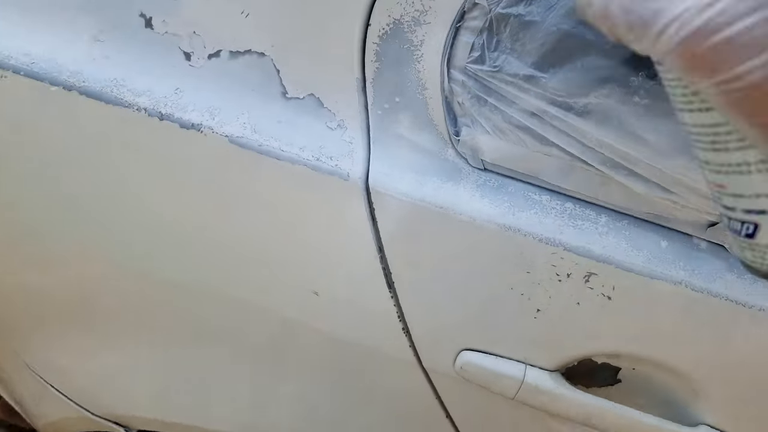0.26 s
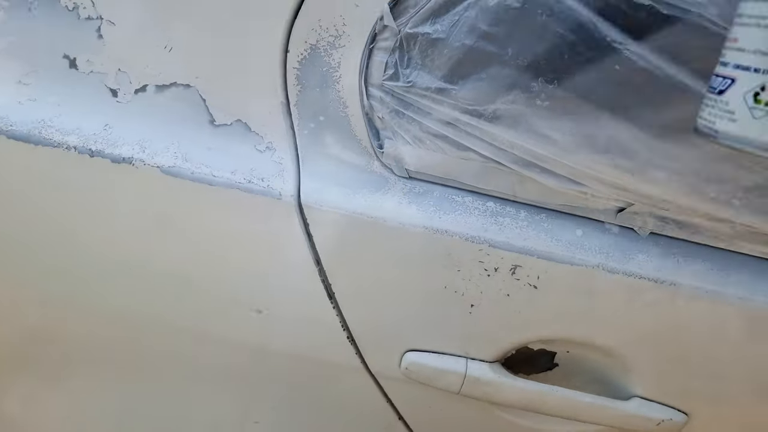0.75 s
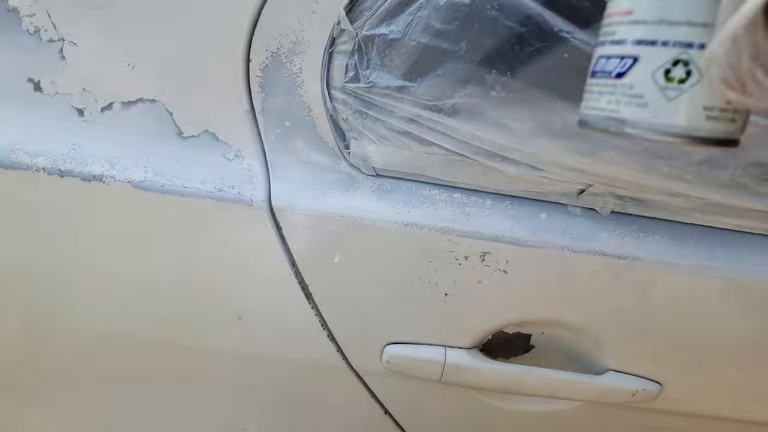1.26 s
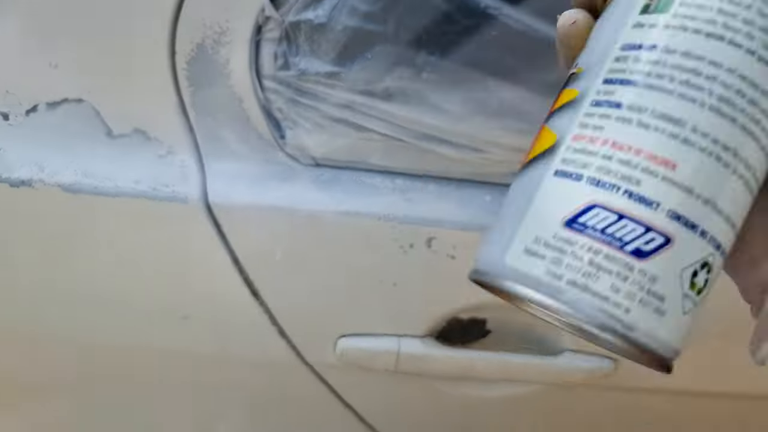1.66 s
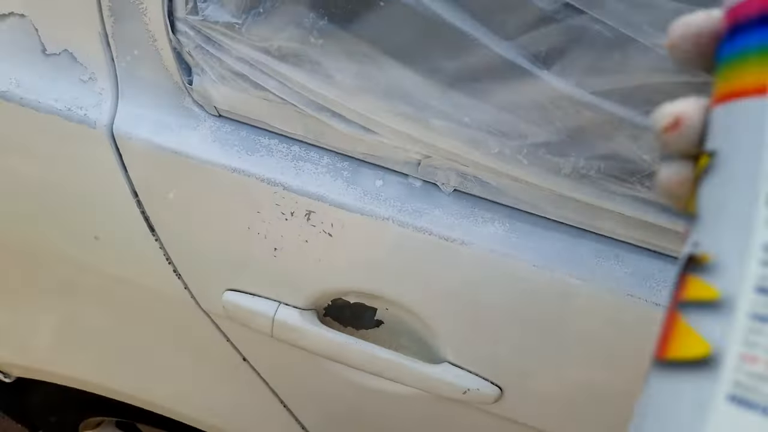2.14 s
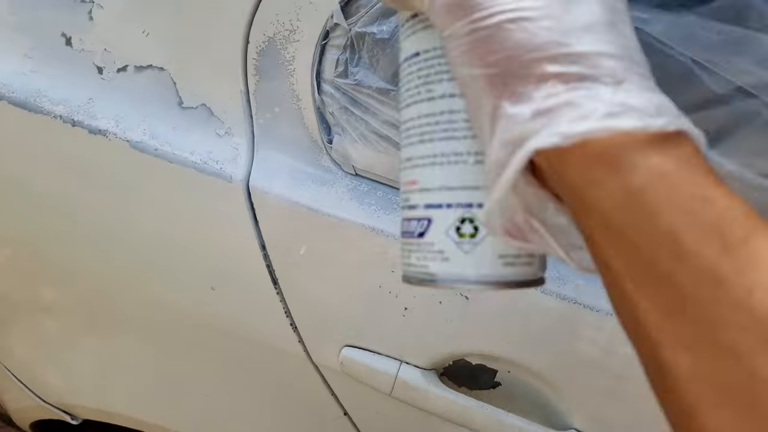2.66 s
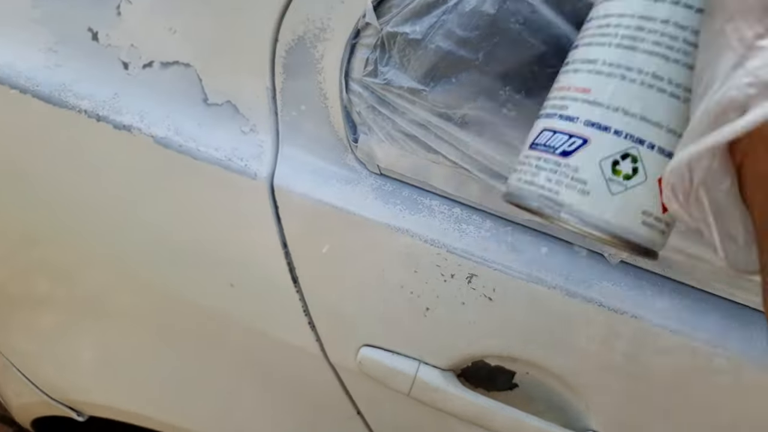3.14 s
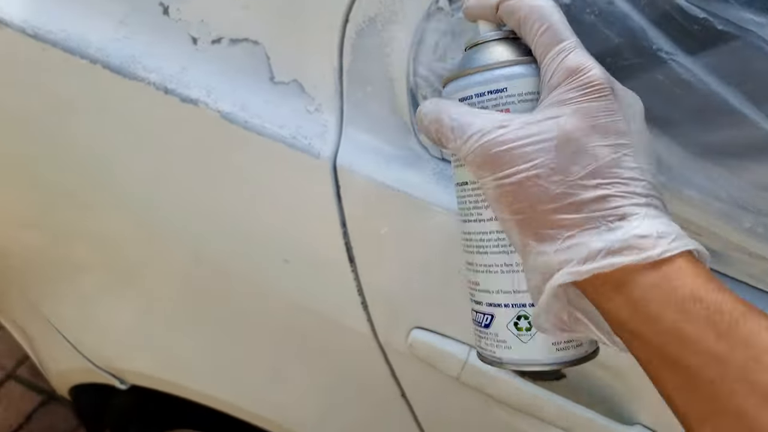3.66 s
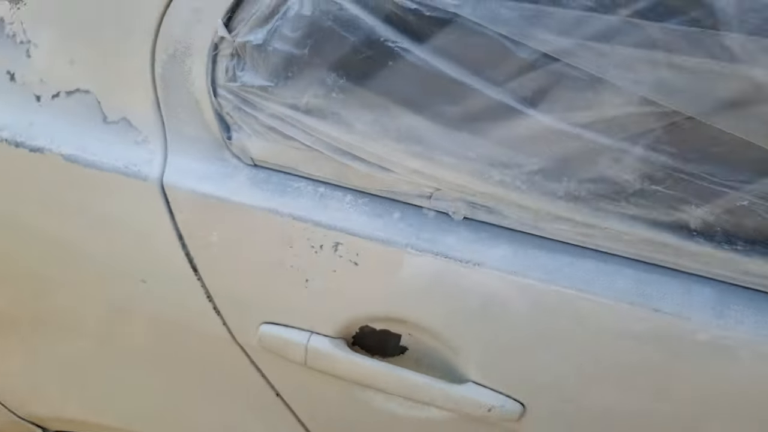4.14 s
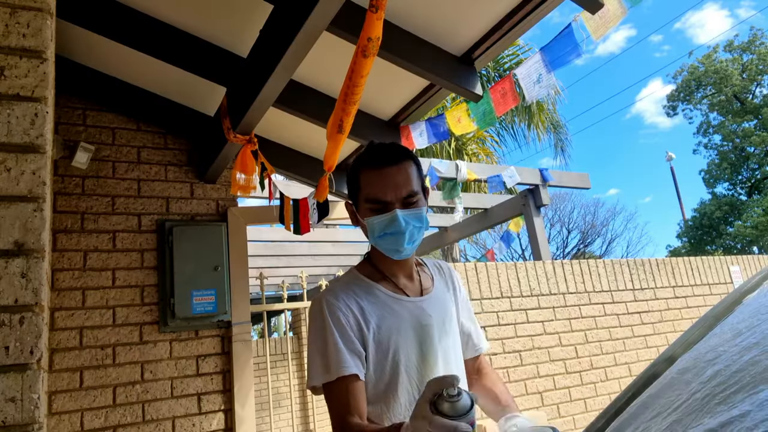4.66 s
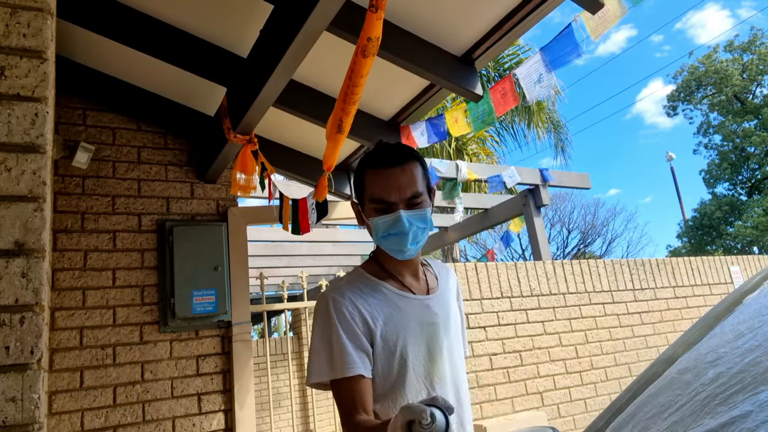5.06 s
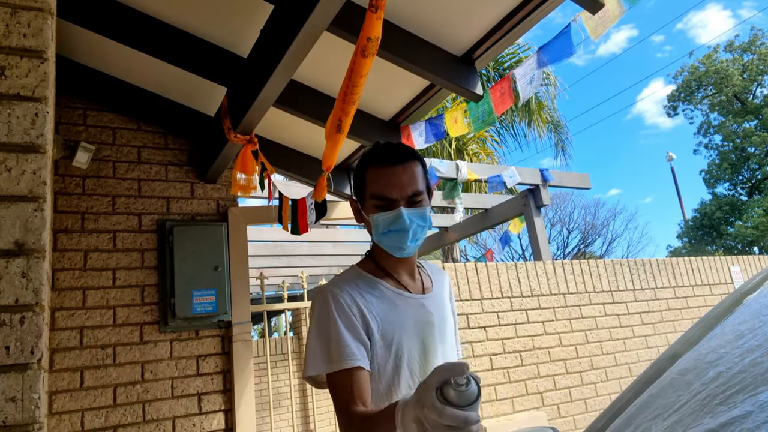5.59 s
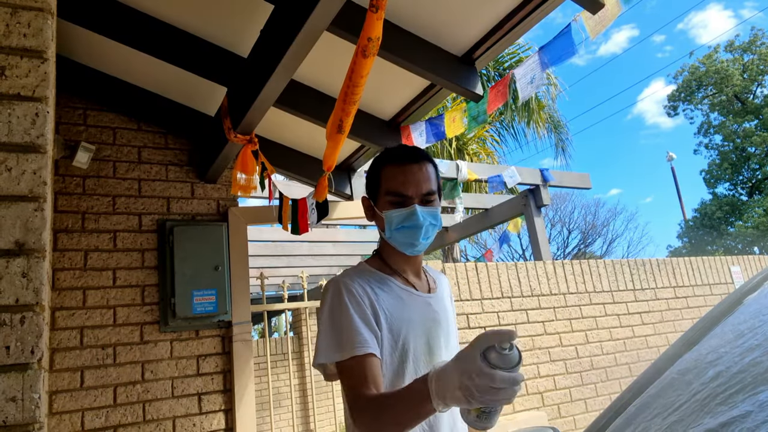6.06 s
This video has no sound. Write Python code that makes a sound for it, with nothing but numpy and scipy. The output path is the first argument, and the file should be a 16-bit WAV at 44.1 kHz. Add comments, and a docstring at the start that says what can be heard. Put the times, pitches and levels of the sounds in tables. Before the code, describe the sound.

A spray can's mixing ball rattles sharply between short bright hissing spurts beside a car, then fainter spurts continue farther off with two panel thuds.

```python
"""A mixing ball knocks on the wall of a shaken aerosol can beside a car: damped wall modes and a noise crack.
From 0.3 s the nozzle fires short spurts of turbulent jet noise, while a glove rustles as grainy hiss.
From 2 s a far whine sounds as a trembling tone, then a like squeak of glove on steel and more spurts.
At 4.3 s the level drops out and swells back; the can is further off, and two panel thuds fall among
its spurts. Throughout, shaped noise gives the distant traffic, and sparse echoes answer can and thuds."""
import sys
import numpy as np
from scipy import signal
from scipy.fft import rfft, irfft
from scipy.io import wavfile
from scipy.ndimage import uniform_filter1d

SR = 44100
rng = np.random.default_rng(int(sys.argv[2]) if len(sys.argv) > 2 else 0)


def transcribe(u):
    """Save the signal u as a 16-bit wav file named by the first command-line argument.

    u: samples, shape (n,) or (channels, n), limited to [-1, 1]; the rate is SR.
    q: integer samples, one column per channel.
    """
    v = np.clip(np.atleast_2d(u).T, -1, 1)
    q = np.round(v * 32767).astype(np.int16)
    wavfile.write(sys.argv[1], SR, q)


def volts_from_decibels(level):
    """Turn decibel levels (scalar or array-like) into linear amplitude factors."""
    exponent = np.asarray(level, float) / 20
    return 10 ** exponent


N = 278712  # length in samples
FAR_FROM_S = 4.312  # from this time the can is further off

# Nozzle spurts. Each row: opening in seconds, shutting in seconds, flow level in dB,
# change of level from open to shut in dB, colour of the body below the treble in dB.
SPURTS = [(0.288, 0.353, -26.5, -0.5, -3), (0.461, 0.546, -27, -1.5, -5), (0.637, 0.718, -29.5, -4, -6.5),
          (0.805, 0.894, -30, -2, -3.5), (0.993, 1.043, -32, -1, -2.5), (1.149, 1.229, -28.5, -2.5, -3),
          (1.304, 1.393, -29, -2, -2.5), (1.483, 1.58, -31.5, 3.5, -5.5), (2.544, 2.61, -32, 1, 0),
          (2.717, 2.815, -34.5, 1.5, -3), (2.922, 3.014, -32.5, 3.5, -4), (3.129, 3.22, -31.5, 1.5, -6.5),
          (3.326, 3.424, -30.5, 0.5, -5.5), (3.562, 3.627, -32, 9.5, -1.5), (3.76, 3.842, -29, 3, -3.5),
          (3.961, 4.048, -29, -7.5, -4.5), (4.475, 4.576, -47.5, -5, 0), (4.602, 4.714, -56, -2, 0),
          (4.732, 4.799, -36.5, -12, -6.5), (4.878, 4.975, -38, -10, -3.5), (5.077, 5.166, -33.5, -5.5, -5),
          (5.254, 5.347, -38, -0.5, -3.5), (5.438, 5.508, -37, -4, -5), (5.606, 5.674, -37.5, -11, -4.5),
          (5.752, 5.832, -36.5, -6.5, -5.5), (5.928, 6.005, -35, -3, -7.5), (6.1, 6.185, -37, -2.5, -6.5),
          (6.278, 6.328, -39, 3, -5)]
# Where the can is held. Each row: time in seconds, treble level left over right in dB,
# lag of the right port in samples.
PLACE = [(0.29, -9.5, 36), (0.46, -10.5, 16), (0.81, -12.5, 24), (1.15, -13, 38), (1.5, -11, 37),
         (2.54, -12.5, 9.9), (2.72, -10.5, 39), (3.33, -9, 39), (3.56, -12.5, 6.1), (3.76, -9.5, 12),
         (3.96, -10.5, 33), (4.4, 1.5, 4.9), (6.3, 4, 6)]
# Spectrum of the jet. Each row: frequency in Hz, relative density in dB per Hz.
JET_SPECTRUM = [(410, -80), (700, -1.5), (1460, 0), (2330, 3), (2840, 7.5), (3640, 2), (4150, 10),
                (4920, 5.5), (7690, 9), (9200, -2), (11000, -1), (12600, 6), (14400, 9), (15400, 0)]
# Likeness of the hiss at the two ports. Each row: frequency in Hz, correlation from 0 to 1.
HISS_LIKENESS = [(500, 1), (2000, 0.29), (5000, 0.26), (9000, 0.24), (15000, 0.13)]
# Clear ball knocks. Each row: time in seconds, peak of the ring in dB, low wall zone in Hz,
# high wall zone in Hz, high zone against low in dB.
KNOCKS = [(0.0239, -13, 2900, 7100, 4), (0.028, -15.5, 1600, 5100, 29), (0.117, -20, 2370, 4070, 26),
          (0.1732, -7, 1770, 3430, 0.5), (0.231, -14, 2840, 3960, 10), (0.2593, -22.5, 2430, 3860, -16),
          (0.3771, -17.5, 2250, 5530, 4), (0.4945, -15, 2850, 4830, -4), (0.519, -22.5, 2450, 5420, -25),
          (0.8066, -5.5, 2420, 4300, -11.5), (0.8493, -18, 2580, 4300, 6), (0.891, -19, 2800, 4300, 3),
          (0.9196, -26, 2500, 4300, 28), (1.0068, -17.5, 1770, 4400, 10.5), (1.0598, -28, 2640, 4570, -1),
          (1.1475, -20.5, 2430, 4470, 1), (1.168, -22.5, 2440, 4400, -12), (1.3251, -10.5, 2780, 5360, 0),
          (1.335, -13, 3020, 5700, -2), (1.6416, -7, 1750, 4400, 12.5), (1.7013, -21.5, 1540, 3200, -26),
          (1.7675, -11, 1860, 3000, 4.5), (1.8292, -20, 1850, 3730, 8.5), (1.87, -18, 2470, 4500, -12),
          (1.8925, -8.5, 2640, 3900, 6.5), (1.9692, -14.5, 2340, 4000, 9.5), (1.997, -29, 1440, 4720, -3),
          (2.0152, -21.5, 1440, 4700, 20), (2.3138, -6.5, 1920, 4240, 9), (2.3211, -8.5, 2700, 3160, -14),
          (2.381, -15.5, 2170, 5750, 29), (2.388, -24.5, 2900, 4650, 21), (2.4053, -8, 2440, 4600, -9),
          (2.5407, -19, 2430, 4600, -6), (2.6029, -21.5, 1530, 4700, 6), (2.757, -23.5, 1700, 4400, 8),
          (2.787, -21, 1320, 7600, 4), (2.842, -7, 2500, 5300, 4), (2.9446, -26, 1390, 4800, 2),
          (3.0561, -8.5, 2320, 4420, 7.5), (3.092, -21.5, 2360, 4450, -3), (3.2687, -8.5, 2520, 4960, -0.5),
          (3.442, -26.5, 2530, 4730, 5), (3.5887, -13, 1880, 4900, 2.5), (3.611, -23.5, 1770, 4470, -15),
          (3.652, -19, 1410, 4430, 27), (3.732, -28, 1180, 4500, 4), (3.858, -10, 2580, 4360, 8),
          (4.091, -13, 2280, 4900, 7), (4.121, -29, 1710, 4460, 7), (5.219, -31.5, 1020, 6700, 21),
          (5.344, -23, 2980, 4400, -5), (5.4234, -29, 1990, 3200, 12), (5.457, -25.5, 2670, 8100, -25),
          (5.5874, -18.5, 2900, 4870, -4), (5.592, -23.5, 2650, 4350, 5), (5.7306, -31, 1070, 3650, 21)]
# Modes of the can wall. Each row: frequency in Hz, relative level in dB.
WALL_MODES = [(950, 3), (1200, 10.5), (1430, 9), (1700, 5.5), (2050, -1.5), (2400, -3), (2600, -3.5),
              (3000, -5), (3400, -4), (3750, -5.5), (4300, -2), (4900, -1), (5450, -1.5), (6100, -23),
              (7400, 0), (8300, 5.5)]
# Spectrum of the contact crack. Each row: frequency in Hz, relative density in dB per Hz.
CRACK_SPECTRUM = [(700, -6.5), (2000, 3.5), (7500, 5.5), (10000, -6), (13500, -1), (16000, -10)]
# Thuds. Each row: time in seconds, level in dB, tilt above 2200 Hz in dB per octave, tail t60 in seconds.
THUDS = [(4.9292, -18, -14.5, 0.17), (5.0963, -12.5, 24, 0.16)]
# Panel modes that the thuds excite. Each row: frequency in Hz, bandwidth in Hz, relative level in dB.
PANEL_MODES = [(255, 31, -3.5), (478, 37, 0.5), (818, 136, 2.5), (1064, 94, 3.5), (1506, 98, -6),
               (2166, 54, -8), (2500, 130, -5), (3600, 140, -21)]
# Glove and paint rustles. Each row: start in seconds, length in seconds, level in dB.
RUSTLES = [(0.09, 0.16, -51), (.22, .08, -52), (1.681, 0.067, -44.5), (1.757, 0.33, -58.5),
           (2.155, 0.095, -48), (2.223, 0.3, -53), (2.638, 0.042, -44), (3.413, 0.14, -56),
           (4.133, 0.091, -49.5), (4.277, 0.058, -45.5), (4.415, 0.36, -59)]
# Spectrum of the rustles. Each row: frequency in Hz, relative density in dB per Hz.
RUSTLE_SPECTRUM = [(880, -18), (1500, -28), (2200, -4), (3200, -2.5), (4500, -7), (7500, -13), (9500, -19),
                   (13500, -19.5), (16000, -32)]
# Squeak of glove on steel. Each row: time in seconds, level in dB, pitch in Hz.
SQUEAK = [(2.352, -71, 3460), (2.362, -37.5, 3460), (2.384, -39, 3390)]
# A faint far whine. Each row: time in seconds, pitch in Hz, level in dB.
WHINE = [(2.0, 1360, -66), (2.1, 1360, -55), (2.45, 1335, -52), (2.7, 1380, -55), (2.95, 1330, -71)]
# Decay of the reflections. Each row: frequency in Hz, t60 in seconds.
YARD_DECAY = [(300, 0.5), (1500, 0.21), (5000, 0.13), (14000, 0.02)]
# Spectrum of the traffic. Each row: frequency in Hz, relative density in dB per Hz.
TRAFFIC_SPECTRUM = [(12, -48), (20, -2), (88, 2), (301, -19.5), (485, -21), (780, -26.5), (1190, -24.5),
                    (1330, -24), (1710, -28.5), (2260, -29), (2990, -35), (3530, -38.5), (3840, -38),
                    (4540, -39.5), (16000, -56)]
# Course of the traffic. Each row: time in seconds, drone level in dB, rumble level in dB.
TRAFFIC_LEVELS = [(0, -41, -43), (.3, -40, -39.5), (.75, -48, -41), (1.25, -48, -37.5), (2.2, -37, -40.5),
                  (2.5, -40, -48), (3.2, -33.5, -40.5), (3.75, -41, -39.5), (4.3, -39.5, -39),
                  (4.5, -40, -42.5), (5.5, -39, -48.5), (6.32, -43, -47.5)]
# Course of the mid wash. Each row: time in seconds, level in dB.
WASH_LEVELS = [(0, -49), (2.2, -47.5), (4.4, -49.5), (6.32, -55)]
# Likeness of low sounds at the two ports. Each row: frequency in Hz, correlation from 0 to 1.
STREET_LIKENESS = [(60, 0.98), (130, 0.9), (290, 0.91), (640, 0.29), (1400, 0.086), (3000, .02)]
# The brief drop of level and its return. Each row: time in seconds, gain in dB.
DIP = [(4.312, -75), (4.33, -18), (4.4, -7.5), (4.46, -3)]


def read(points, hz):
    """Interpolates a spectrum on a logarithmic frequency axis."""
    f, value = np.transpose(points)
    return np.interp(np.log(hz + 1), np.log(f + 1), value)


def evened(x):
    """Normalises the mean power to one."""
    return x / np.sqrt(np.mean(x ** 2) + 1e-20)


def add(mix, s, sound):
    """Superposes a stereo sound on the mix from s seconds."""
    part = mix[:, max(round(s * SR), 0):][:, :sound.shape[1]]
    part += sound[:, :part.shape[1]]


def curve(tables, column, quiet):
    """Interpolates a table column linearly in time, with the value quiet outside its rows."""
    t, out = np.arange(N) / SR, np.full(N, float(quiet))
    for rows in map(np.array, tables):
        inside = (t >= rows[0, 0]) & (t <= rows[-1, 0])
        out[inside] = np.interp(t[inside], rows[:, 0], rows[:, column])
    return out


def noise(size, colour_db, likeness, lag=0.):
    """Partly coherent noise at two ports; the shared part reaches the right port lag samples late."""
    hz = np.fft.rfftfreq(size, 1 / SR)
    left, other = rfft(rng.standard_normal((2, size)))
    shared = np.clip(read(likeness, hz), -1, 1)
    delay = np.exp(-2j * np.pi * hz * lag / SR)
    right = shared * left * delay + np.sqrt(1 - shared ** 2) * other
    return irfft(np.array([left, right]) * volts_from_decibels(colour_db(hz)), size)


def flutter(size, width):
    """Slow random modulation of rms 1: white noise averaged twice over width samples."""
    once = uniform_filter1d(rng.standard_normal(size), int(width))
    return evened(uniform_filter1d(once, int(width)))


def shadow(hz):
    """Diffraction round the housing: only the treble is shaded, fully so 0.6 octave above 8 kHz."""
    return np.clip(np.log2((hz + 1) / 8000) / .6, 0, 1)


def spurts():
    """Turbulent jet noise gated by a valve; once it shuts, the last gas dribbles out duller and uneven."""
    size, lead_s = 8192, .03
    # each pair: near, far
    open_s, shut_db_per_s = (.0022, .0019), (3000, 1200)
    dribble_start_db, dribble_db_per_s, sputter_db = (-10.5, -6.5), (374, 242), (5.1, 1.5)
    treble_arch_db = (2, 1)
    treble = signal.butter(2, 10000, "high", fs=SR, output="sos")
    out, t = np.zeros((2, N)), np.arange(size) / SR - lead_s
    held_s, held_db, held_lag = np.transpose(PLACE)
    for start, end, db, change_db, body_db in SPURTS:
        far = int(start > FAR_FROM_S)
        pan_db, lag = np.interp(start, held_s, held_db), np.interp(start, held_s, held_lag)
        uneven_db = 1.6 * flutter(size // 2 + 1, 60)  # random uneven colour for each spurt

        def colour(hz):
            body = body_db * (1 - shadow(hz))
            pan = np.outer([.5, -.5], pan_db * shadow(hz))
            return read(JET_SPECTRUM, hz) + uneven_db + body + pan

        jet = evened(noise(size, colour, HISS_LIKENESS, lag))
        dull = signal.lfilter([.45], [1, -.55], jet)
        after = np.maximum(t - (end - start), 0)  # seconds since the valve shut
        progress = np.clip(t / (end - start), 0, 1) - .5
        opening = 1 / (1 + np.exp(-t / open_s[far]))
        sputter = volts_from_decibels(sputter_db[far] * flutter(size, 70))
        # the fizz swells more than the body in mid-spurt
        fizz = signal.sosfiltfilt(treble, jet)
        fizz_db = treble_arch_db[far] * (1.5 - 2 * abs(progress)) + 1.4 * flutter(size, 200)
        jet = jet + fizz * (volts_from_decibels(fizz_db) - 1)
        dribble_db = dribble_start_db[far] - dribble_db_per_s[far] * after
        dribble = dull * sputter * volts_from_decibels(dribble_db) * (after > 0)
        gas = jet * volts_from_decibels(-shut_db_per_s[far] * after) + dribble
        arch_db = .5 - 2 * abs(progress)  # the flow peaks in mid-spurt
        unsteady_db = 1.27 * flutter(size, 410) + 1.55 * flutter(size, 36)
        flow_db = db + change_db * progress + arch_db + unsteady_db
        add(out, start - lead_s, gas * opening * volts_from_decibels(flow_db) * signal.windows.tukey(size, .05))
    return out


def knocks():
    """Impact on a damped shell: modes near two zones ring, and paint and hand choke them within a few ms."""
    size = 2600
    out, t = np.zeros((2, N)), np.arange(size) / SR
    hz, mode_db = np.transpose(WALL_MODES)
    side_db = np.outer([.5, -.5], 2.2 - 2.3 * np.log2(hz / 2500))  # low modes lean left, the highest right
    choke_s = (.0024 * (2000 / hz) ** .35)[:, None]
    blows = KNOCKS + bounces()
    draws = rng.standard_normal((len(blows), 3, 2, len(WALL_MODES)))
    for (s, db, low_hz, high_hz, high_db), (spread, phase, detune) in zip(blows, draws):
        low_zone_db = -26 * abs(np.log2(hz / low_hz))
        high_zone_db = high_db - 26 * abs(np.log2(hz / high_hz))
        chance_db = 2.5 * spread
        weight = volts_from_decibels(mode_db + side_db + chance_db) * (volts_from_decibels(low_zone_db) + volts_from_decibels(high_zone_db))
        lag_s = (18 if s < FAR_FROM_S else 4) / SR
        since = np.maximum(t - np.array([[0], [lag_s]]), 0)  # seconds since arrival at each port
        u = since[:, None]
        pitch = (hz * (1 + .02 * detune[0]))[:, None]
        angle = 2 * np.pi * pitch * u + .7 * phase[..., None]  # all modes start nearly together
        rings = np.sin(angle) * np.exp(-(u / choke_s) ** 1.4)
        ring = (weight[..., None] * rings).sum(1) * (1 - np.exp(-since / 0.00074))
        hiss = evened(noise(size, lambda f: read(CRACK_SPECTRUM, f), HISS_LIKENESS))
        decay = volts_from_decibels(-8.5 - 60 * since / 0.011) + volts_from_decibels(-22.5 - 60 * since / 0.031)
        crack = hiss * decay * (1 - np.exp(-since / 0.00013))
        sharp = 0.29 + 1 / (1 + volts_from_decibels(-high_db))  # blows that excite the high zone also crack more
        add(out, s, volts_from_decibels(db) * (ring / abs(ring).max() + sharp * crack))
    return out


def bounces():
    """Inelastic rebound: one faint later blow after each knock, on the same wall zones."""
    wait, size = rng.random((len(KNOCKS), 2)).T
    rows = np.array(KNOCKS)
    rows[:, 0] += .018 * (.2 - np.log(1 - wait))  # 3.6 ms plus an exponential wait of mean 18 ms
    rows[:, 1] = np.minimum(rows[:, 1] - 13, -35) + 2.5 * (2 * size - 1)
    return [tuple(row) for row in rows]


def thuds():
    """Modal ring of a damped panel under a soft blow, with a short noise tail; the harder is brighter."""
    size = 8000
    out, t = np.zeros((2, N)), np.arange(size) / SR

    def tail_colour(f):
        return -14 * np.maximum(np.log2(300 / (f + 1)), 0) - 9 * abs(np.log2((f + 1) / 520))

    for s, db, tilt_db, t60 in THUDS:
        ring = np.zeros(size)
        for hz, width, mode_db in PANEL_MODES:
            level = volts_from_decibels(mode_db + tilt_db * max(np.log2(hz / 2200), 0))
            ring += level * np.exp(-np.pi * width * t) * np.sin(2 * np.pi * hz * t)
        ring *= 1 - np.exp(-t / 0.0014)  # a soft contact
        tail = evened(noise(size, tail_colour, STREET_LIKENESS, 4))
        tail = tail * volts_from_decibels(-60 * t / t60) * (1 - np.exp(-t / 0.00086))
        sides_db = np.array([[.9], [-.9]])
        add(out, s, volts_from_decibels(db + sides_db) * (ring / abs(ring).max() + volts_from_decibels(-12) * tail))
    return out


def rustle():
    """Friction noise: grainy hiss of glove film and sloshing paint, each swelling and dying smoothly."""
    edge_s = 0.059  # longest swell
    t = np.arange(N) / SR
    hiss = evened(noise(N, lambda f: read(RUSTLE_SPECTRUM, f), HISS_LIKENESS, 22.7))
    level = np.zeros(N)
    for s, length, db in RUSTLES:
        to_edge = np.minimum(t - s, s + length - t)
        level += volts_from_decibels(db) * np.clip(to_edge / min(edge_s, length / 2), 0, 1) ** 2
    return hiss * level * volts_from_decibels(4.9 * flutter(N, 330))


def wavering(tables, hz_column, db_column, rough, tremble_db):
    """A sinusoid under random frequency and amplitude modulation, 12 samples late at the right port."""
    hz = curve(tables, hz_column, 1000) * (1 + rough * flutter(N, 22))
    tone = np.sqrt(2) * np.sin(2 * np.pi * np.cumsum(hz) / SR)
    level_db = curve(tables, db_column, -120) + tremble_db * flutter(N, 400)
    level = uniform_filter1d(volts_from_decibels(level_db), 100)
    return np.array([tone * level, np.roll(tone * level, 12)])


def yard(x):
    """Sparse reflections from car door, paving and wall, absorbed at a rate that depends on frequency."""
    size, gap = SR // 2, 20  # samples
    taps = np.zeros((2, size))
    grid = np.arange(120, size - gap, gap)
    at = grid + rng.integers(0, gap, (2, (size - 121) // gap))
    np.put_along_axis(taps, at, rng.choice([-1., 1.], at.shape), 1)
    hz, t, z = signal.stft(taps, SR, nperseg=256)
    decay = volts_from_decibels(-60 * t / read(YARD_DECAY, hz)[:, None])
    tail = signal.istft(z * decay, SR, nperseg=256)[1]
    return signal.fftconvolve(x, tail / np.linalg.norm(tail[0]), axes=1)[:, :N]


def traffic():
    """Coherence falls with frequency: near-mono engine drone and road rumble under a wider mid wash."""
    def drone(f):
        return -22 * abs(np.log2((f + 1) / 48))

    def above(f, edge_hz):
        return -16 * np.maximum(np.log2(edge_hz / (f + 1)), 0)

    def rumble(f):
        upper_slope = -16 * np.maximum(np.log2((f + 1) / 240), 0)
        return read(TRAFFIC_SPECTRUM, f) + above(f, 59) + upper_slope

    def wash(f):
        return read(TRAFFIC_SPECTRUM, f) + above(f, 231.0)

    t = np.arange(N) / SR
    s, drone_db, rumble_db = np.transpose(TRAFFIC_LEVELS)
    wash_s, wash_db = np.transpose(WASH_LEVELS)
    street = np.zeros((2, N))
    for colour, at, db in [(drone, s, drone_db), (rumble, s, rumble_db), (wash, wash_s, wash_db)]:
        street += evened(noise(N, colour, STREET_LIKENESS)) * volts_from_decibels(np.interp(t, at, db))
    return street * volts_from_decibels(np.array([[.55], [-.55]]))


def scene():
    """Superposition of can, thuds, their reflections, glove, tones and street."""
    jet, blows = spurts(), knocks() + thuds()
    echoes = yard(volts_from_decibels(-13.0) * jet + volts_from_decibels(-23) * blows)
    squeak = wavering([SQUEAK], 2, 1, rough=0.076, tremble_db=4.4)
    whine = wavering([WHINE], 1, 2, rough=0.0035, tremble_db=2.)
    return jet + blows + echoes + rustle() + squeak + whine + traffic()


def top_cut(x):
    """Nothing passes above the cut-off."""
    return signal.sosfilt(signal.butter(12, 16650, fs=SR, output="sos"), x)


def record(dry):
    """Gain and band limitation: the level drops out and swells back, and a low-pass removes the top."""
    dipped = dry * volts_from_decibels(curve([DIP], 1, 0))
    low_pass = signal.firwin(511, 15600, window=("kaiser", 6), fs=SR)
    limited = signal.oaconvolve(dipped, low_pass[None], "same")
    return top_cut(limited)


dry = scene()
out = record(dry)
transcribe(out)
```